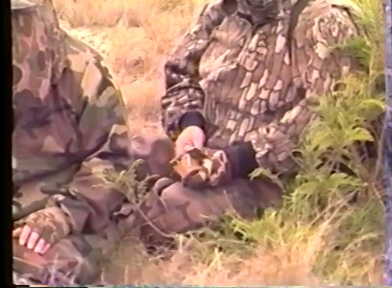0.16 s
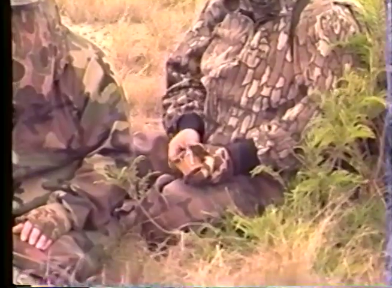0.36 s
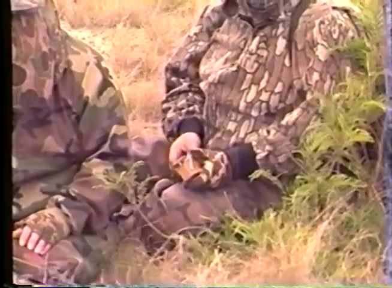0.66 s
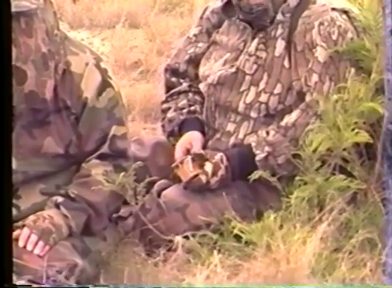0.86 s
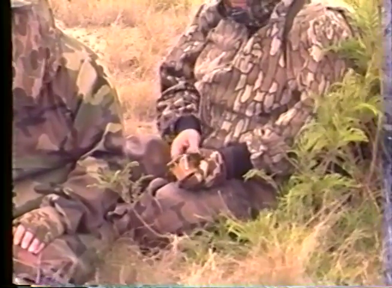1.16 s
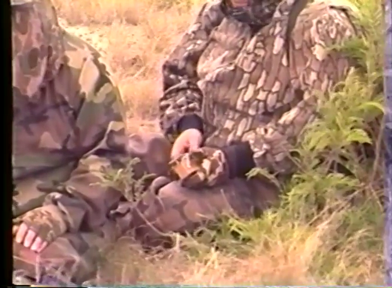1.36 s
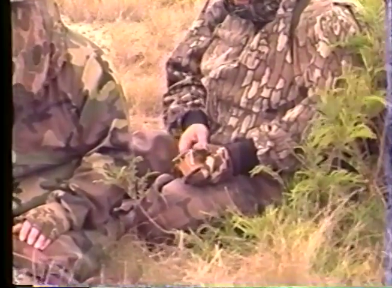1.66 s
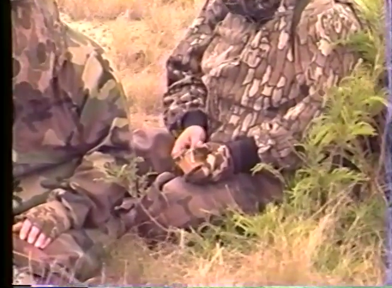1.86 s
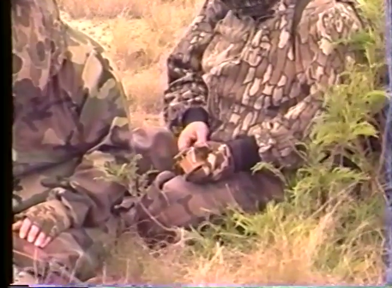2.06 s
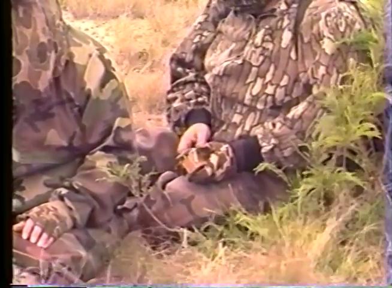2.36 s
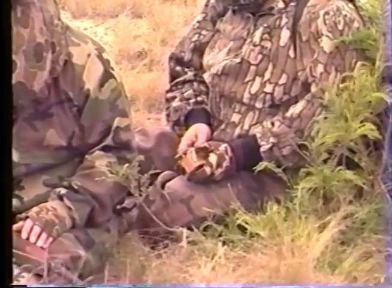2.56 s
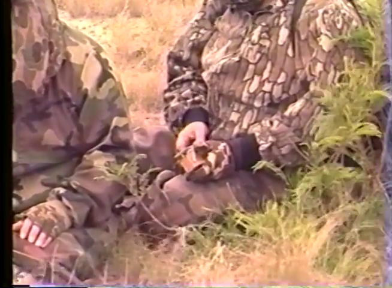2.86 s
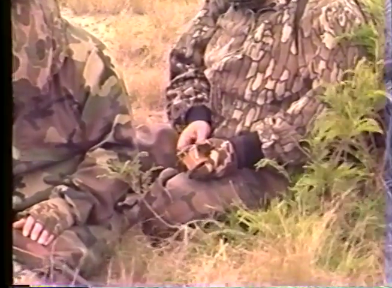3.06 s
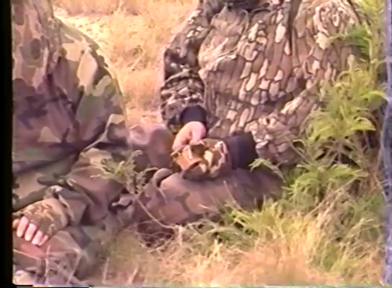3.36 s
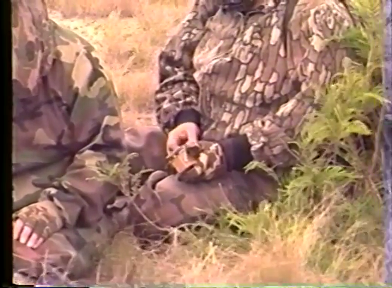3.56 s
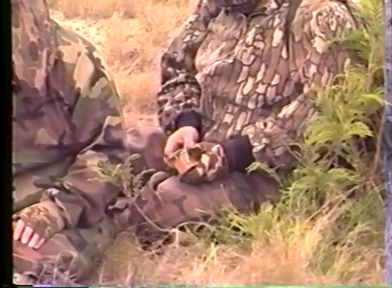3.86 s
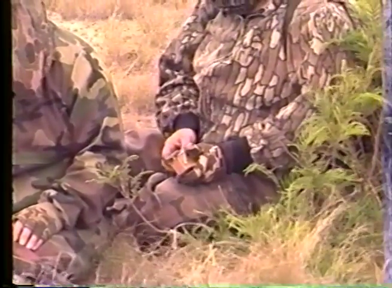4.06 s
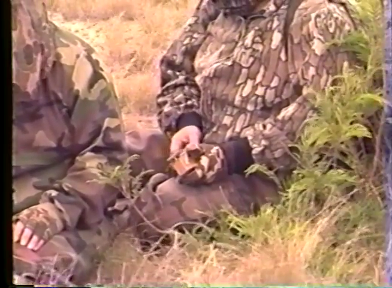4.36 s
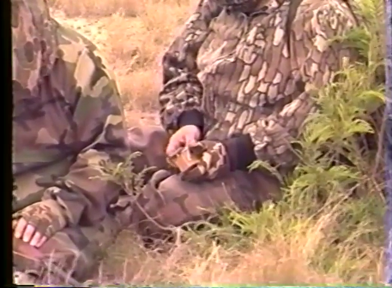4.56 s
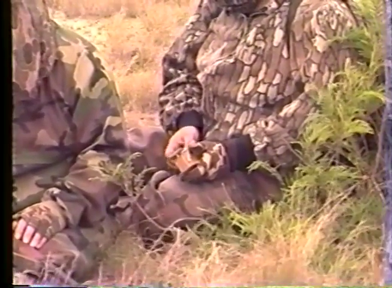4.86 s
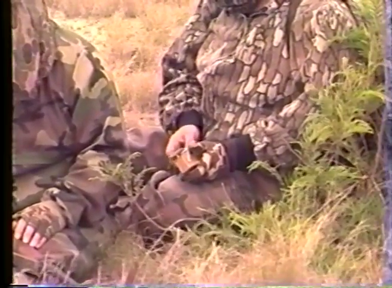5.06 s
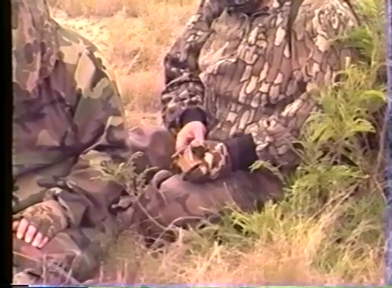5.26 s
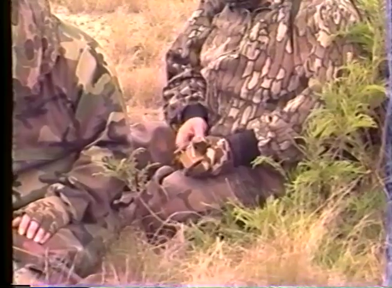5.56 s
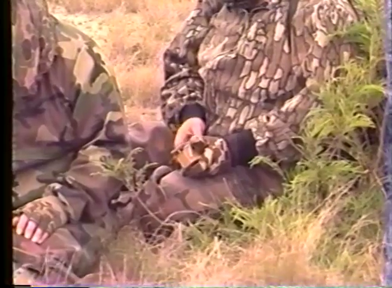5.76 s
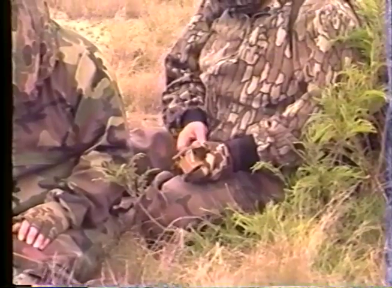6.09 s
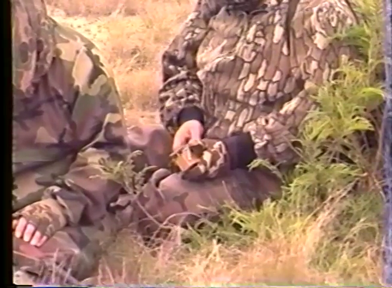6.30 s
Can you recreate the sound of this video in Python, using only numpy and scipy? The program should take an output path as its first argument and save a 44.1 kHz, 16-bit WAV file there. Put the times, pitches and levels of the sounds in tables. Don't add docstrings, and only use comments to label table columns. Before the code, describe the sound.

Dry, nasal, hollow wood yelps, loud and centred, come in two quick series outdoors. Between them are scratches, small knocks, two clipped clucks and a sustained squeaky whine. Each yelp bites high, drops in pitch and breaks into chalky rasp with a short woody ring. Soft wind rumble, thin far bird notes and snapping grass fill gaps over old tape hiss, faint buzz and hum.

```python
import sys
import numpy as np
from scipy import signal
from scipy.fft import rfft, irfft
from scipy.io import wavfile
from scipy.ndimage import uniform_filter1d, minimum_filter1d

SR = 44100
rng = np.random.default_rng(int(sys.argv[2]) if len(sys.argv) > 2 else 0)


def amp(db):
    return 10 ** (np.asarray(db, float) / 20)


def write(x):
    x = np.atleast_2d(x).T
    wavfile.write(sys.argv[1], SR, np.round(np.clip(x, -1, 1) * 32767).astype(np.int16))


N = 283559
BOX_FLOOR_HZ = 520

# (time [s], length [s], rasp level [dB],
# lid ring level [dB], lid pitch [Hz])
STROKE_BREAKS = [(.868, 0.023, -29, -28, 861), (1.141, 0.029, -28, -27, 867),
                 (1.402, .017, -28, -27.5, 873), (1.664, 0.026, -29, -25.5, 890),
                 (1.934, 0.03, -27.5, -25, 864), (2.704, 0.013, -34.5, -26.5, 885),
                 (3.514, 0.012, -35.5, -27, 900), (4.712, 0.016, -42, -62, 988),
                 (4.997, 0.02, -37.5, -45, 956), (5.248, 0.016, -29, -27, 882),
                 (5.531, 0.014, -27, -28.5, 871), (5.795, 0.02, -26.5, -26, 888),
                 (6.059, 0.014, -24.5, -26, 875), (6.327, 0.015, -28, -25.5, 897)]


def evened(x):
    return x / np.sqrt(np.mean(x ** 2) + 1e-20)


def wobble(size, span):
    return evened(uniform_filter1d(uniform_filter1d(rng.standard_normal(size), span), span))


def add(mix, s, sound):
    part = mix[round(s * SR):][:len(sound)]
    part += sound[:len(part)]


def read(points, hz):
    f, value = np.transpose(points)
    return np.interp(np.log(hz + 1), np.log(f + 1), value)


def unroll(rows, edge_s):
    s, *columns = np.transpose(rows)
    t = np.arange(s[0], s[-1], 1 / SR)
    window = np.clip(np.minimum(t - s[0], s[-1] - t) / edge_s, 0, 1)
    return s[0], [np.interp(t, s, c) for c in columns], window


def ring_of(modes):
    t = np.arange(2048) / SR
    return sum(sign * amp(db) * width * np.exp(-np.pi * width * t) * np.sin(2 * np.pi * hz * t)
               for hz, width, db, sign in modes)


def stroke(start, hold, fall, first_hz, turn_hz, ending):
    slow_hz, fast_hz = 645, 800
    break_s, break_length, _, lid_db, _ = ending
    end = break_s - start
    fade = 0.58 * break_length * amp(0.3 * (-31.5 - lid_db))
    t = np.linspace(0, end + fade, num=40)
    late = np.clip((t - hold) / fall, 0, 1)
    gone = np.maximum(t - end, 0) / fade
    hurry = np.log2((turn_hz - slow_hz) / fall / 3500)
    bite_hz = 62.2 * 2 ** hurry * np.exp(-t / 0.00487)
    held_hz = np.interp(t, [0, hold], [first_hz, turn_hz]) + bite_hz
    hz = slow_hz + (held_hz - slow_hz) * (1 - late) ** 1.4
    fast = np.clip((hz - fast_hz) / 50, 0, 1)
    db = -17.5 - 3 * fast - 3.5 * late - 26 * gone
    sharp_db = -14.5 + 4 * hurry + 0.5 * fast + 4 * late - 16.5 * gone
    return np.transpose([start + t, db, hz, sharp_db])


def shifting(t):
    # (time [s], second-order loss [dB], rate rise [share], length [s])
    shifts = [(.493, -3, .02, .007), (.505, 4, -.025, .004), (.526, 5, .005, .006), (.538, -3, 0, .006),
              (.81, 6, .015, .008), (1.066, 3, .05, .003), (1.076, 4, -.01, .004), (1.354, 3, .04, .003),
              (1.364, 5, .005, .006), (1.634, 3, .025, .004), (1.878, 2, -.03, .003),
              (2.691, 6, .01, .004), (3.502, -1, .05, .002), (4.124, 0, .02, .004), (4.139, 0, .015, .004),
              (4.157, 0, .02, .004), (4.168, 0, .012, .012), (4.69, 0, .013, .03), (4.955, 0, .01, .02),
              (5.51, 0, .018, .012), (5.186, 4, .05, .002), (5.21, 9, .035, .003), (5.486, 6, .015, .007),
              (5.475, 0, -.04, .003), (5.735, 3, .03, .002), (5.758, 7, .02, .004), (6.292, 3, .025, .004)]
    return sum(np.array([[loss_db], [rise]]) * np.exp(-((t - at) / length) ** 2)
               for at, loss_db, rise, length in shifts)


def favouring(orders, hz):
    # (order [number], slips per second [Hz], width [Hz], level [dB])
    favours = [(1, 792, 12.5, -13), (1, 872, 45, -3), (4, 738, 21, -7.5), (4, 650, 16, 5), (5, 738, 22, 4),
               (5, 805, 20, -2.5), (6, 685, 15, -3), (6, 748, 20, 2.5), (3, 862, 30, 5), (4, 785, 18, 4),
               (5, 775, 14, -4)]
    return sum((orders == round(order)) * db * np.exp(-((hz - at_hz) / width) ** 2)
               for order, at_hz, width, db in favours)


def dipping():
    # (time [s], depth [dB], length [s])
    dips = [(4.127, 22, .0045), (4.142, 18, .003), (4.159, 9, .003), (4.18, 3, .003), (4.339, 7, .002),
            (4.355, 6, .004), (6.003, 5, .004), (1.62, 3, .005), (1.633, 2, .004), (5.733, 3, .004),
            (4.162, 3, .003), (5.482, 4, .005), (4.897, 4, .005), (2.685, 8, .002), (4.148, 3, .015),
            (1.362, 3, .008), (5.185, 5, .002), (1.334, 8, .005), (.48, 7, .005), (.789, 4, .003),
            (4.613, 4, .004), (4.113, 3, .006), (4.075, 2.5, .012), (4.174, 2.5, .008)]
    t = np.arange(N) / SR
    return sum(depth_db * np.exp(-((t - s) / length) ** 2) for s, depth_db, length in dips)


def slipping(s, db, hz, over_db, window, gain):
    # (low edge [Hz], high edge [Hz])
    bite_band = [1220, 3700]
    size, orders = len(hz), np.arange(1, 19)[:, None]
    age = np.arange(size) / SR
    loss_db, rise = shifting(s + age)
    favour_db = favouring(orders, hz)
    hz = hz * (1 + rise)
    jitter = 0.012 * amp(0.3 * over_db) * wobble(size, 30)
    turns = np.cumsum(hz * (1 + jitter)) / SR

    drift_db = 2.2 * np.array([wobble(size, 300) for _ in orders]) * (orders > 2)
    tilt_db = 0.44 * over_db * np.log2(np.maximum(orders / 2, 1))
    first_db = (orders == 1) * (-3 + 0.082 * over_db)
    quick = np.clip((hz - 739) / 40, 0, 1)
    bead_db = (orders > 2) * 2 * wobble(size, 70)
    quick_db = ((orders == 4) * 5.5 - (orders == 3) * 3.5 + bead_db) * quick
    heights = amp(tilt_db + drift_db + favour_db + quick_db + first_db)

    treble_waking = 1 - np.exp(-(age / 0.0032) ** 2)
    second_waking = amp((orders == 2) * -loss_db)
    waking = np.where(orders > 2, treble_waking, second_waking)
    slips = (heights * waking * np.cos(2 * np.pi * orders * turns)).sum(0)

    bite_filter = signal.butter(2, bite_band, "bandpass", fs=SR)
    bite = 1.68 * np.exp(-age / 0.0076) * signal.lfilter(*bite_filter, rng.standard_normal(size))
    grit = bite + 0.097 * rng.standard_normal(size)
    grit = grit * (1.63 + np.exp(-(turns % 1) / 0.56)) * amp(0.5 * over_db)
    rung_heights = heights * gain[(orders * hz).astype(int)]
    loudness = np.sqrt((rung_heights[1:] ** 2).sum(0) / 2)
    return (slips + grit) * amp(db + 0.5 * wobble(size, 90)) / loudness * window


def yelps(ring):
    # (start [s], hold [s], fall [s], first slip rate [Hz], slip rate at the turn [Hz])
    strokes = [(0.789, 0.022, 0.057, 790, 844), (1.06, 0.036, 0.047, 815, 814),
               (1.333, .034, 0.038, 810, 819), (1.615, 0.02, 0.029, 802, 790),
               (1.872, 0.023, 0.038, 805, 810), (2.6836, 0.0075, 0.014, 947, 741.7),
               (3.497, 0.0067, 0.012, 956, 728.7), (4.611, 0.021, 0.069, 724, 749.5),
               (4.894, 0.024, 0.061, 747, 751.6), (5.179, .032, 0.04, 787, 804),
               (5.471, 0.023, 0.038, 814, 794), (5.728, 0.031, 0.037, 800, 803),
               (6, 0.018, 0.039, 768, 762), (6.27, 0.026, 0.035, 764, 756)]
    # (time [s], level [dB], slip rate [Hz], sharpness as treble share [dB])
    opener = [
        (.478, -18.5, 827, -21.5),
        (0.495, -22, 886, -19),
        (.53, -20.5, 821, -12.5),
        (0.553, -20.5, 698, -16.5),
        (0.586, -23.5, 655, -25),
        (0.615, -43.5, 635, -33),
    ]
    # (time [s], level [dB], slip rate [Hz], sharpness as treble share [dB])
    whine = [
        (4.047, -28.5, 730, -28),
        (4.1, -24, 751, -24),
        (4.121, -23, 790, -15.5),
        (4.195, -20.5, 780.7, -17),
        (4.248, -20.5, 737, -24.5),
        (4.281, -19.5, 734, -22),
        (4.33, -21, 657, -26),
        (4.36, -28.5, 645, -29.5),
        (4.369, -45, 645, -27),
    ]
    usual_sharp_db = -14
    drive, gain = np.zeros(N), abs(rfft(ring, SR))
    trains = []
    for row, ending in zip(strokes, STROKE_BREAKS):
        rows = stroke(*row, ending)
        trains.append((rows, 0.0028 * amp(-0.6 * (rows[0][3] - usual_sharp_db))))
    trains += [(opener, 0.0028), (whine, 0.0028)]
    for rows, edge_s in trains:
        s, (db, hz, sharp_db), window = unroll(rows, edge_s)
        add(drive, s, slipping(s, db, hz, sharp_db - usual_sharp_db, window, gain))
    rung = signal.oaconvolve(drive / amp(dipping()), ring)[:N]
    return signal.lfilter(*signal.butter(3, BOX_FLOOR_HZ, "highpass", fs=SR), rung)


def grains(size, spread_db):
    slips = rng.standard_normal(size) * amp(spread_db * wobble(size, 25))
    return evened(signal.lfilter(*signal.butter(2, 9500, fs=SR), slips))


def breaking(s, length, rasp_db, lid_db, lid_hz):
    t = np.linspace(0, length + 0.086, num=12)
    after = np.maximum(t - length, 0)
    rasp = rasp_db - 496 * t - 1295.5 * after
    lid = lid_db - 145.5 * t - 1297.5 * after
    return np.transpose([s + t, rasp, lid, lid_hz * (1 + 0.1 * np.exp(-t / 0.0052))])


def rasps(ring):
    # (time [s], length [s], rasp level [dB], lid ring level [dB], lid pitch [Hz])
    bursts = [
        (0.59, 0.017, -39.5, -42.5, 901),
        (2.685, 0.0056, -15.5, -22, 812),
        (3.496, 0.0098, -18.5, -25, 877),
        (4.337, 0.033, -29.5, -41.5, 945),
    ]
    # (frequency [Hz], level [dB])
    tilt = [(500, 11.5), (1400, -17), (2200, 2.5), (4000, -4), (8000, 4), (14000, -20)]
    # (frequency [Hz], level below the first [dB])
    top_hz, top_db = (2090, -18)
    drive, lid, hz = np.zeros(N), np.zeros(N), np.fft.rfftfreq(2048, 1 / SR)
    for row in STROKE_BREAKS + bursts:
        s, (rasp_db, lid_db, lid_hz), window = unroll(breaking(*row), 0.0057)
        size = len(window)
        chalk = grains(size, spread_db=3)
        dull = signal.lfilter(*signal.butter(2, 2800, fs=SR), chalk)
        chalk = dull + (chalk - dull) * amp(0.64 * np.minimum(rasp_db + 27.5, 0))
        add(drive, s, chalk * amp(rasp_db) * window)
        turns = np.cumsum(lid_hz * (1 + 0.012 * wobble(size, 60))) / SR
        upper = np.cumsum(top_hz * (1 + 0.014 * wobble(size, 60))) / SR
        tones = np.sin(2 * np.pi * turns) + amp(top_db) * np.sin(2 * np.pi * upper)
        add(lid, s, np.sqrt(2) * tones * amp(lid_db + 1.5 * wobble(size, 80)) * window)
    tilt_taps = np.roll(irfft(amp(read(tilt, hz))), 64)[:128]
    gritty = signal.fftconvolve(ring, tilt_taps)[64:]
    drive = signal.lfilter(*signal.butter(3, 850, "highpass", fs=SR), drive)
    return signal.oaconvolve(drive, gritty / np.linalg.norm(gritty))[:N] * amp(0.5) + lid


def scrapes(touches, ring, spread_db):
    drive = np.zeros(N)
    for start, length, level_db, fade_db in touches:
        rows = [(start, level_db), (start + length, level_db + fade_db)]
        s, (db,), window = unroll(rows, 0.002)
        add(drive, s, grains(len(window), spread_db) * amp(db) * window)
    drive = signal.lfilter(*signal.butter(3, BOX_FLOOR_HZ * 1.5, "highpass", fs=SR), drive)
    return signal.oaconvolve(drive, ring / np.linalg.norm(ring))[:N]


def rattles(ring):
    # (time [s], length [s], level [dB], fade [dB])
    touches = [
        (1.323, 0.011, -35, 4),
        (4.341, 0.028, -44, -4.5),
        (2.682, .004, -50, 1),
        (4.603, .011, -40, -3),
        (4.996, 0.051, -44, -30.5),
        (6.259, 0.012, -34, 3.5),
    ]
    return scrapes(touches, ring, spread_db=3)


def clatters():
    # (time [s], length [s], level [dB], fade [dB])
    touches = [
        (2.686, 0.016, -25.5, -2),
        (3.499, .013, -28, -5.5),
    ]
    # (frequency [Hz], width [Hz], level [dB], sign and share [ratio])
    modes = [(2630, 670, -1, 0.92), (4500, 500, -4.5, -1), (5500, 700, -5, 1), (8600, 970, -9.5, -1.1),
             (12500, 3000, -27, 0.56)]
    return scrapes(touches, ring_of(modes), spread_db=3)


def back_strokes():
    # (time [s], length [s], level [dB], fade [dB])
    touches = [
        (.21, 0.026, -37.5, -3),
        (.962, 0.014, -39.5, -12.5),
        (1.508, 0.041, -33, -6),
        (1.55, 0.03, -41.5, -11.5),
        (2.054, 0.044, -39.5, -9),
        (2.236, 0.027, -39.5, -12.5),
        (4.74, 0.057, -58.5, 6),
        (5.045, 0.028, -49.5, -5),
    ]
    # (frequency [Hz], width [Hz], level [dB], sign and share [ratio])
    modes = [(970, 130, -11.5, 1), (1380, 170, -4, 0.51), (1970, 170, -30.5, -1), (2440, 540, -18, -0.87),
             (3830, 650, -18, 1), (5490, 310, -15, 1), (6260, 250, -25, -2.5), (7350, 190, -22, 0),
             (8500, 860, -16.5, -1.14), (11260, 800, -35.5, -1.5)]
    return amp(-4.5) * scrapes(touches, ring_of(modes), spread_db=2.5)


def drags():
    # (time [s], length [s], level [dB], fade [dB])
    touches = [
        (5.375, 0.065, -57, -5.5),
        (1.79, .075, -62, 2),
        (5.65, 0.045, -64.5, 4),
        (5.91, 0.06, -65, 7),
        (6.175, 0.086, -65.5, 8),
    ]
    # (frequency [Hz], width [Hz], level [dB], sign and share [ratio])
    modes = [(960, 45, 5.5, 1), (2220, 260, -4, -0.96)]
    return scrapes(touches, ring_of(modes), spread_db=2.8)


def ticks(ring):
    # (time [s], peak [dB], pitch [Hz], t60 [s], crack share [0-1])
    taps = [(0.4315, -24, 846, 0.012, 0.53), (0.7645, -25, 880, 0.025, 0.62), (1.971, -31, 940, 0.02, 1),
            (5.4735, -18, 1510, .02, 0.5), (5.726, -28, 1700, .012, .6), (1.872, -27.5, 1800, .012, .6),
            (1.712, -46, 1500, .02, .6), (2.013, -36, 840, 0.051, 0.02), (2.232, -19.5, 1310, 0.018, 0.44),
            (3.042, -37, 850, 0.018, 0.5), (1.326, -21, 1600, .03, .6), (3.502, -29, 450, .04, 0),
            (2.688, -30, 330, .04, .02), (2.688, -25, 160, 0.023, 0.2), (3.501, -33.5, 170.6, 0.04, 0.1),
            (0.963, -44, 830, 0.069, 0.2), (6.099, -38, 920, 0.022, 0.5), (6.263, -32.5, 770, 0.05, 0.6)]
    out, t = np.zeros(N), np.arange(2000) / SR
    for s, db, hz, t60, share in taps:
        tone = np.sin(2 * np.pi * hz * t) * amp(-60 * t / t60)
        crack = np.convolve(rng.standard_normal(len(t)) * amp(-60 * t / 0.01), ring)[:len(t)]
        crack = signal.lfilter(*signal.butter(1, 2200, fs=SR), crack)
        rise_s = 0.00033 + 0.0041 * (share < 0.05)
        knock = tone * np.minimum(t / rise_s, 1)
        add(out, s, amp(db) * (knock + share * crack / abs(crack).max()))
    return out


def catches():
    # (time [s], peak [dB], pitch [Hz], length [s])
    snags = [(0.215, -38, 1474, 0.0038), (0.225, -41, 1400, 0.0034), (0.237, -37, 1308, 0.0033),
             (1.512, -27, 1408, 0.002), (1.518, -30, 1486, 0.0036), (1.523, -37, 1400, .003),
             (1.532, -30, 1440, 0.0028), (1.54, -25, 1377, 0.004), (1.547, -27, 1420, .003),
             (1.559, -31.5, 1420, .004), (1.568, -39, 1380, .005), (1.577, -39, 1460, .004),
             (2.248, -48, 1365, 0.0036), (2.696, -25.5, 689, 0.0072), (3.507, -23, 680, 0.0042),
             (3.0435, -35, 1338, 0.002), (4.342, -23.5, 923, 0.0047), (4.357, -23, 933, 0.0058),
             (4.375, -39.5, 934, 0.011), (4.72, -37, 997, 0.014), (4.765, -49.5, 1320, 0.0029),
             (4.79, -48.5, 1330, .003), (5.005, -28.5, 967, 0.0056), (5.019, -40, 1280, .007),
             (5.037, -53, 1270, 0.0033), (5.066, -44, 1305, .004), (6.265, -25, 1480, .002),
             (4.735, -39.5, 1300, 0.0057), (2.061, -37, 1342, 0.0036), (2.072, -30.5, 1370, 0.0032),
             (2.087, -37, 1330, .004), (2.097, -45, 1190, .004), (4.758, -51.5, 1250, 0.0051),
             (4.775, -46, 1077, .005), (4.79, -44.5, 1045, 0.0031), (5.056, -40.5, 1280, 0.0048),
             (5.063, -44, 1034, .005)]
    out = np.zeros(N)
    for s, db, hz, length in snags:
        t = np.arange(-.025, .025, 1 / SR)
        turns = np.cumsum(hz * (1 + 0.03 * wobble(len(t), 40))) / SR
        add(out, s + t[0], amp(db) * np.exp(-(t / length) ** 2) * np.sin(2 * np.pi * turns))
    return out


def thumps(call, shake_db, push_db, top_hz):
    effort = np.sqrt(abs(uniform_filter1d(call ** 2, size=150)))
    low = signal.lfilter(*signal.butter(1, top_hz, fs=SR), rng.standard_normal(N) * effort)
    push = signal.lfilter(*signal.butter(1, 40, "highpass", fs=SR), effort)
    both = amp(shake_db) * low + amp(push_db) * push
    return signal.lfilter(*signal.butter(3, 2.43 * top_hz, fs=SR), both)


def twigs():
    # (time [s], peak [dB], centre [Hz])
    snaps = [
        (2.3948, -35, 7360),
        (2.643, -28.5, 4200),
        (2.644, -37, 1500),
        (2.8562, -42, 4700),
        (2.965, -38, 8740),
        (3.2055, -35, 7800),
        (3.38, -39, 6000),
    ]
    out, t = np.zeros(N), np.arange(600) / SR
    for s, db, hz in snaps:
        band = signal.butter(1, [hz * .5, min(hz * 1.6, SR / 2.5)], "bandpass", fs=SR)
        burst = signal.lfilter(*band, rng.standard_normal(len(t))) * amp(-60 * t / 0.019)
        add(out, s, amp(db) * burst / abs(burst).max())
    return out


def whistles(notes, start, end):
    out = np.zeros(N)
    for s, length, middle_hz, db in notes:
        start_hz, end_hz = start * middle_hz, end * middle_hz
        u = np.linspace(-1, 1, int(length * SR))
        bend_hz = (start_hz + end_hz) / 2 - middle_hz
        hz = middle_hz + (end_hz - start_hz) / 2 * u + bend_hz * u ** 2
        arched = middle_hz > max(start_hz, end_hz) + 150
        hz = hz * (1 + 0.07 * arched * wobble(len(u), 12))
        shimmer = amp(db + 2.7 * wobble(len(u), 40)) * signal.windows.tukey(len(u), .4)
        add(out, s, np.sqrt(2) * np.sin(2 * np.pi * np.cumsum(hz) / SR) * shimmer)
    return out


def birds():
    # (time [s], length [s], middle pitch [Hz], level [dB])
    level = [(0, .09, 2170, -62), (0, .09, 2390, -66), (.176, .008, 5400, -55), (.198, .01, 5400, -52),
             (.212, .026, 2700, -52), (.272, .021, 5400, -59), (1.428, .025, 2050, -57),
             (1.6, .02, 2800, -62), (2.33, .11, 2330, -65), (2.455, .04, 2100, -63),
             (2.525, .065, 2090, -61), (3.325, .058, 2400, -58), (3.475, .022, 2900, -59),
             (4.42, .03, 8130, -53), (4.425, .051, 8930, -66), (5.647, .038, 7520, -61.5),
             (5.697, .055, 2990, -51.5), (5.82, .03, 2050, -54)]
    settling = [(3.163, .025, 4300, -61), (3.222, .045, 2600, -59), (4.572, .05, 2700, -59.5),
                (4.828, .068, 2760, -57.5), (5.099, .093, 2790, -56.5), (5.399, .075, 2740, -53)]
    rising = [(3.292, .092, 2150, -57), (3.35, 0.0097, 8940, -47.5), (3.939, 0.0076, 9000, -48.5),
              (4.526, .04, 8130, -55.5), (4.841, 0.028, 7800, -51.5), (5.091, 0.036, 7750, -57)]
    falling = [(5.311, 0.048, 7930, -59), (5.425, 0.048, 8150, -51.5)]
    plunging = [(4.58, 0.0066, 6000, -57), (4.87, 0.0097, 6040, -58), (5.12, 0.0066, 6600, -51),
                (5.921, .009, 5900, -55), (6.403, 0.029, 6130, -62.5)]
    arched = [(5.925, 0.056, 6800, -55.5), (6.168, 0.073, 6360, -55.5)]
    swept = [(1.276, 0.033, 3640, -54)]
    steady = whistles(level, .995, 1.005) + whistles(settling, 1.1, .965)
    gliding = whistles(rising, .95, 1.065) + whistles(falling, 1.08, .93) + whistles(swept, .81, 1.11)
    return steady + gliding + whistles(plunging, 1.28, .8) + whistles(arched, .8, .76)


def coloured(points, likeness):
    frames, hz = N // 256 + 5, np.fft.rfftfreq(1024, 1 / SR)
    a, b, c, d, patches = rng.standard_normal((frames, 513, 5)).T
    patches = evened(uniform_filter1d(uniform_filter1d(patches, 10, 0), 10, 1))
    same = np.clip(read(likeness, hz), -1, 1)[:, None]
    left = a + 1j * b
    right = same * left + np.sqrt(1 - same ** 2) * (c + 1j * d)
    z = np.array([left, right]) * amp(read(points, hz)[:, None] + 0.5 * patches)
    return evened(signal.istft(z, nperseg=1024, noverlap=768)[1][:, :N])


def field():
    # (frequency [Hz], level [dB per Hz])
    colour = [(12, -48), (20, -21), (58, 0.5), (235, -12), (290, -7.5), (345, -12.5), (825, -16),
              (976, -16.5), (1090, -18.5), (1290, -22), (1660, -26.5), (2320, -25.5), (3630, -27),
              (16000, -28)]
    # (time [s], level [dB])
    swell = [(0, -49), (1.001, -44.5), (2, -47.5), (2.45, -46), (2.9, -48), (3.4, -46), (4, -47),
             (5, -45.5), (6.43, -53)]
    # (frequency [Hz], left-right likeness [0-1])
    likeness = [(60, 0.98), (240, 1.0), (950, 1.0), (3770, 1), (15000, 1)]
    return coloured(colour, likeness) * amp(np.interp(np.arange(N) / SR, *np.transpose(swell)))


def gusts():
    # (time [s], level [dB])
    buffets = [(0.0, -72), (0.32, -58), (0.47, -52.5), (1.31, -54), (1.59, -61.5), (2.17, -53),
               (2.561, -43), (2.76, -42), (2.88, -66), (3.37, -64), (3.53, -38), (3.74, -77), (4.17, -41),
               (4.51, -59.5), (4.6, -60), (6.43, -50)]
    rumble = signal.butter(2, [24, 75], "bandpass", fs=SR, output="sos")
    shared, left, right = signal.sosfilt(rumble, rng.standard_normal((3, N)))
    level = amp(np.interp(np.arange(N) / SR, *np.transpose(buffets)))
    return evened(shared + 0.22 * np.array([left, right])) * level


def ducking(call, knee_db, fall_db_s, power):
    level_db = 10 * np.log10(abs(signal.lfilter([.001], [1, -.999], call ** 2)) + 1e-12)
    level_db = -minimum_filter1d(-level_db, size=2001, origin=1000)
    fall = np.arange(N) * fall_db_s / SR
    held_db = np.maximum.accumulate(level_db + fall) - fall
    return (1 + amp(held_db - knee_db)) ** -power


def tape_hiss():
    # (frequency [Hz], level [dB per Hz])
    colour = [(180, -29), (300, -0.5), (494, -19), (667, -17.5), (2400, -24.5), (8640, -35.5), (16000, -20)]
    # (frequency [Hz], left-right likeness [0-1])
    likeness = [(30, .85), (150, .65), (400, .8), (3000, .9), (15000, .78)]
    return coloured(colour, likeness) * amp(-68)


def breathing(call, db):
    swell = np.sqrt(abs(uniform_filter1d(call ** 2, size=600))) ** 0.084
    tracks = np.array([[1, 0.32], [1, -.35]]) @ rng.standard_normal((2, N))
    return amp(db) * swell * tracks


def buzz(call, db, decay_s):
    # (first change [s], strength [share])
    switches = [
        (.0172, 1),
        (.0306, .6),
    ]
    clicks = np.zeros(N)
    for s, share in switches:
        clicks[(np.arange(s, N / SR - .001, 1 / 29.97) * SR).astype(int)] = share
    t = np.arange(600) / SR / decay_s
    strength = np.sqrt(abs(uniform_filter1d(call ** 2, size=300)))
    return amp(db) * np.convolve(clicks * strength, t * np.exp(1 - t))[:N]


def lines(tones, waver_db, span):
    t = np.arange(N) / SR
    return sum(np.sqrt(2) * amp(db + waver_db * wobble(N, span))
               * np.sin(2 * np.pi * (hz * t + rng.random())) for hz, db in tones)


def hum():
    # (frequency [Hz], level [dB])
    tones = [(29.97, -67), (59.94, -54), (89.9, -63.5), (119.9, -72.5), (149.9, -71), (179.8, -70.5),
             (239.8, -71)]
    return lines(tones, 2.1, span=3000)


def picture_whistle():
    # (frequency [Hz], level [dB])
    tones = [(15360, -84), (15734, -72)]
    return lines(tones, 4.5, span=300)


def scene():
    # (frequency [Hz], width [Hz], level [dB], sign and share [ratio])
    wall_modes = [(648.4, 47, -17.5, 1), (890, 156, -9, 0.99), (1230, 207, 1, 0.63),
                  (1518.5, 255, 0, -1.006), (1997, 209, -8, 0.92), (2266, 276, -13, -1.08),
                  (3463, 470, -26.5, -0.87), (3875, 219, -10.5, 0.87), (4120, 227, -14, -1.114),
                  (4740, 750, -28, 0.61), (5620, 610, -22, 0.59), (6340, 150, -23.5, -0.96),
                  (7230, 415, -29, -0.95), (8460, 520, -32.5, -0.91), (11050, 1100, -51, 1)]
    wall = ring_of(wall_modes)
    call = yelps(wall) + rasps(wall) + rattles(wall) + clatters()
    call = call + back_strokes() + drags() + ticks(wall) + catches()
    near = call + thumps(call, shake_db=-11.5, push_db=-14.5, top_hz=111.0)
    gain = ducking(call, knee_db=-37.5, fall_db_s=300, power=1.0)
    outdoors = birds() + twigs() + field() * gain + gusts() * gain ** 0.36
    own = tape_hiss() + breathing(call, db=-63.0) + buzz(call, db=-18, decay_s=.0006) + hum()
    return near + outdoors + own + picture_whistle() * gain ** .15


def low_pass(x):
    return signal.sosfilt(signal.butter(12, 16920, fs=SR, output="sos"), x)


def record(dry):
    ceiling = 0.36
    rounded = ceiling * np.tanh(dry / ceiling) * amp(np.array([[0], [-.45]]))
    band = signal.firwin(511, 15950, window=("kaiser", 9), fs=SR)
    limited = signal.oaconvolve(rounded, band[None], "same")
    return low_pass(limited)


dry = scene()
out = record(dry)
write(out)
```